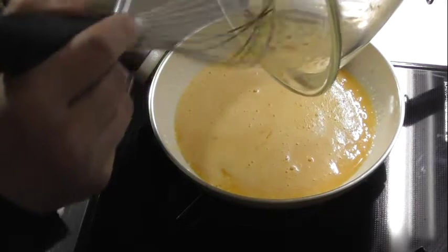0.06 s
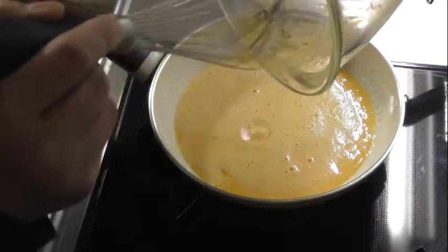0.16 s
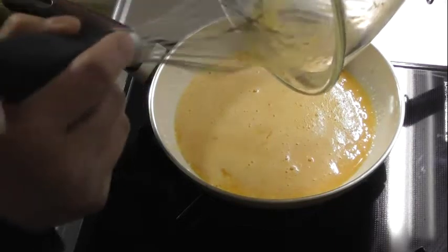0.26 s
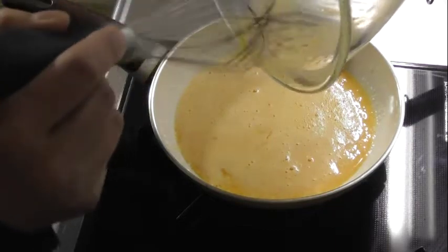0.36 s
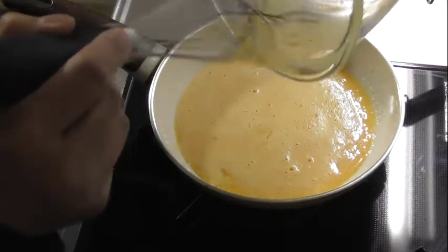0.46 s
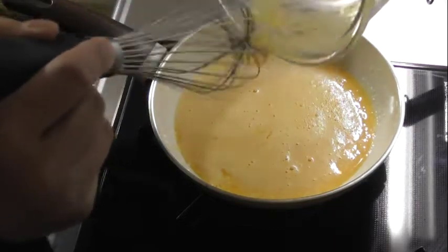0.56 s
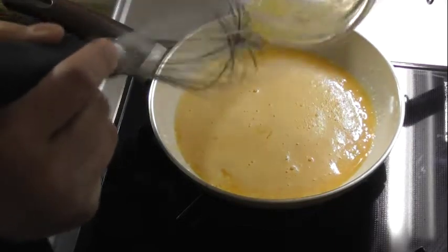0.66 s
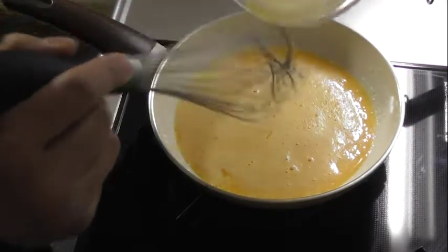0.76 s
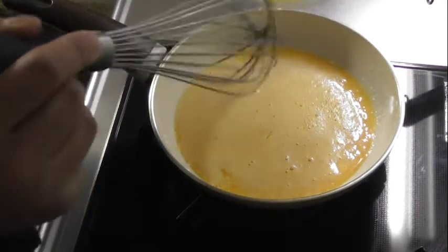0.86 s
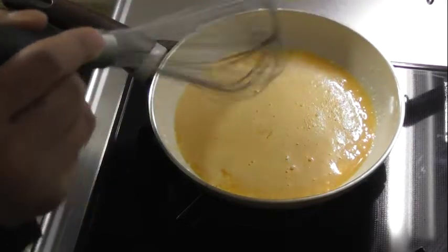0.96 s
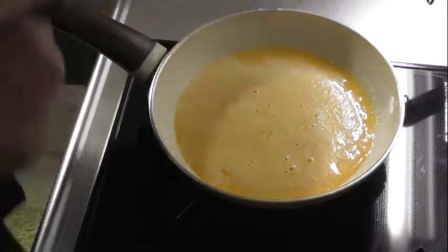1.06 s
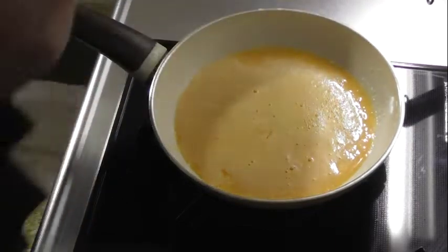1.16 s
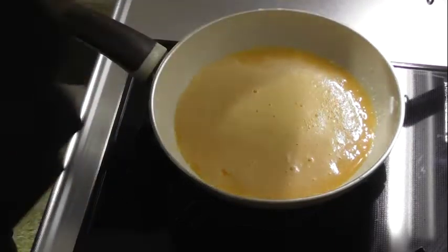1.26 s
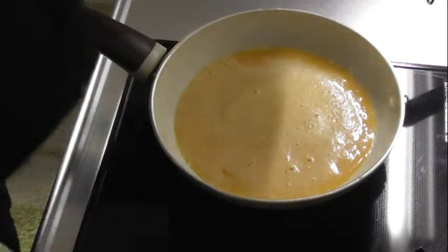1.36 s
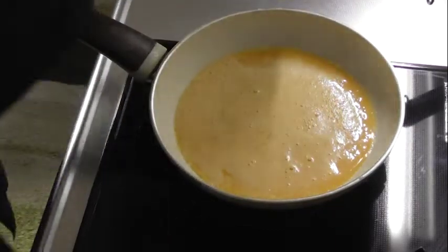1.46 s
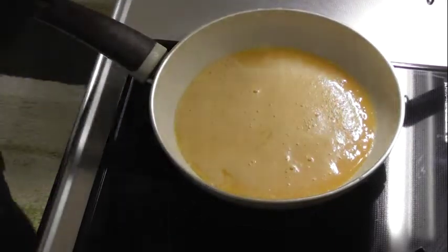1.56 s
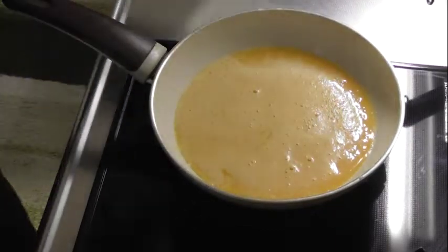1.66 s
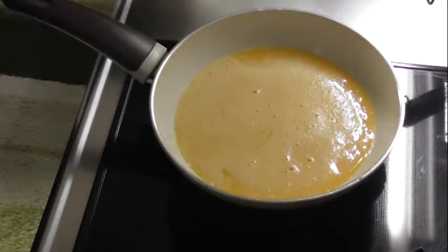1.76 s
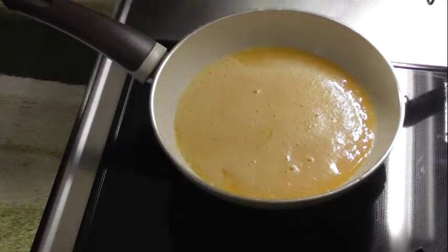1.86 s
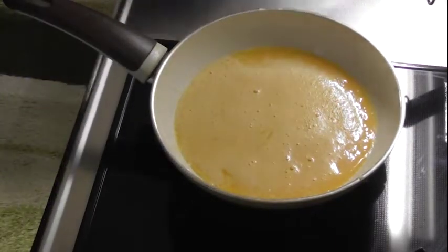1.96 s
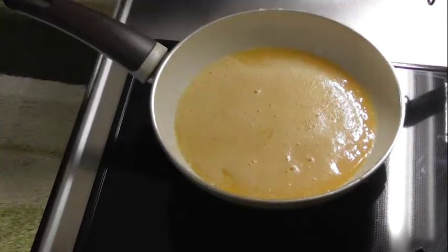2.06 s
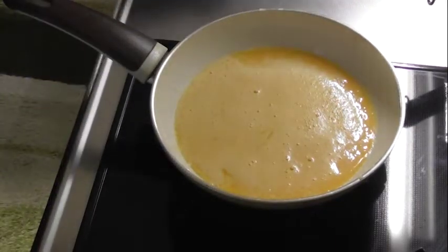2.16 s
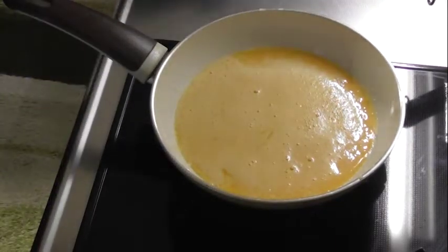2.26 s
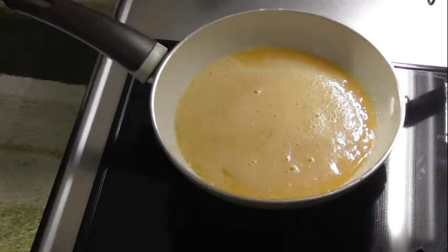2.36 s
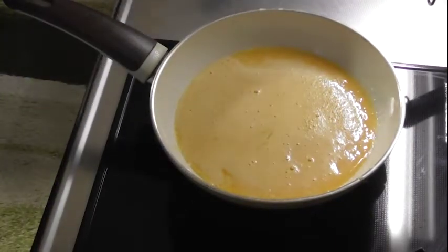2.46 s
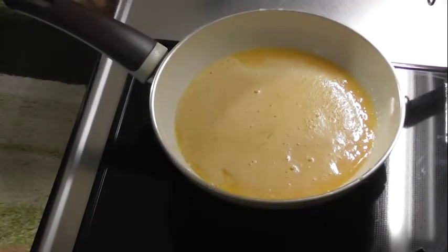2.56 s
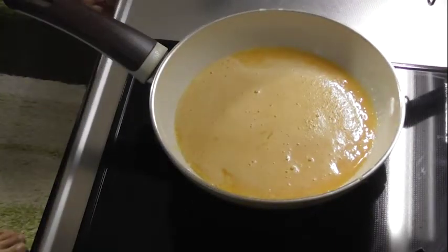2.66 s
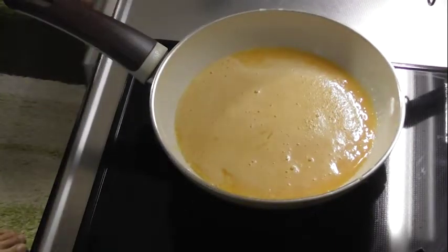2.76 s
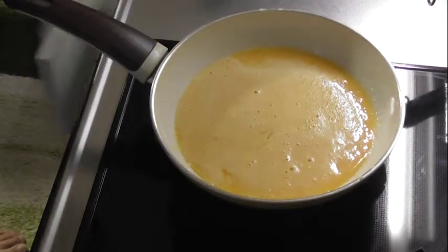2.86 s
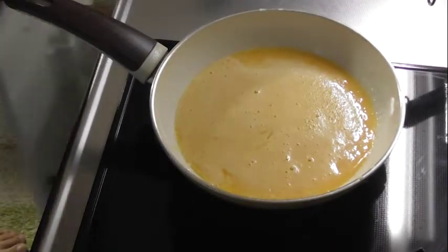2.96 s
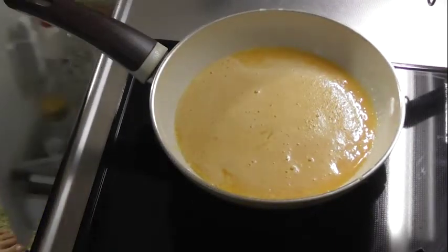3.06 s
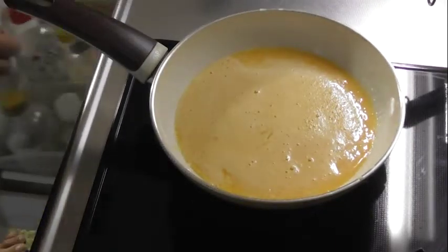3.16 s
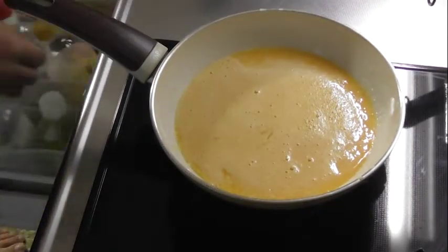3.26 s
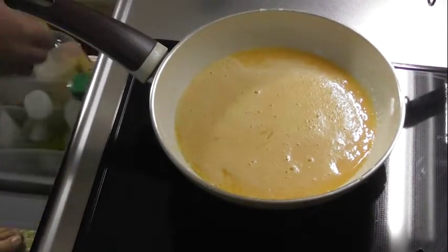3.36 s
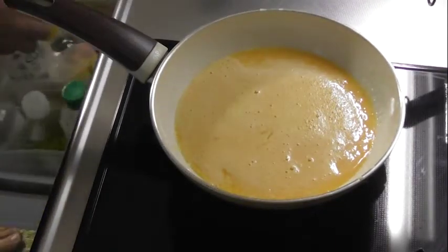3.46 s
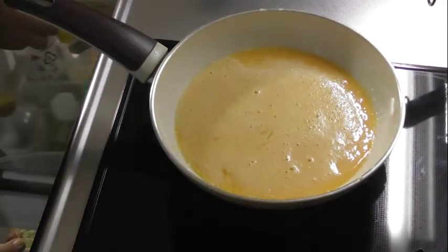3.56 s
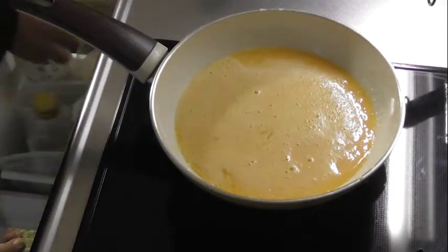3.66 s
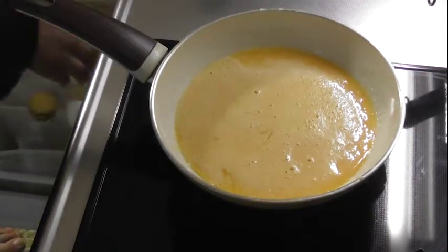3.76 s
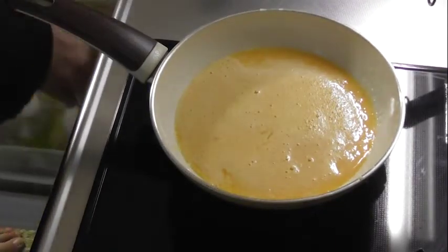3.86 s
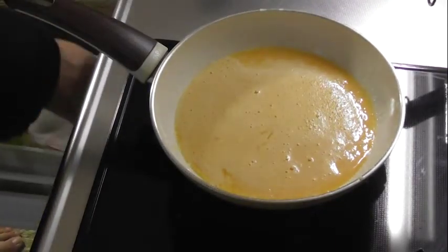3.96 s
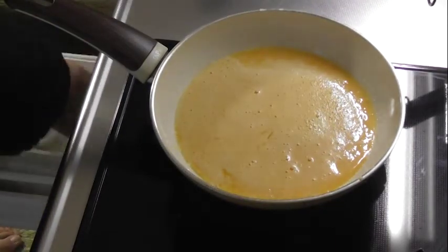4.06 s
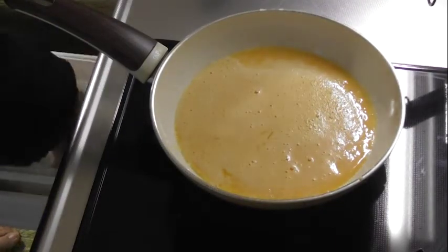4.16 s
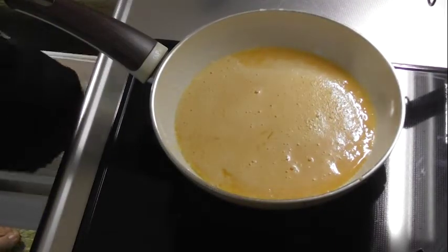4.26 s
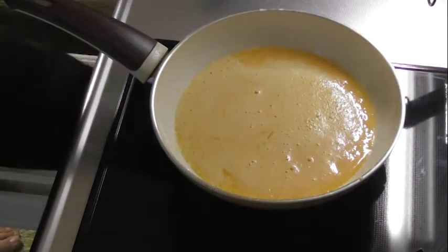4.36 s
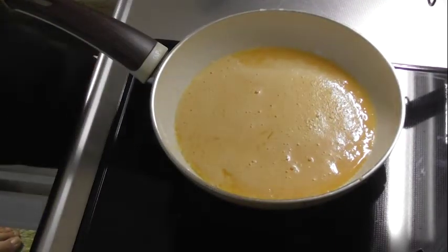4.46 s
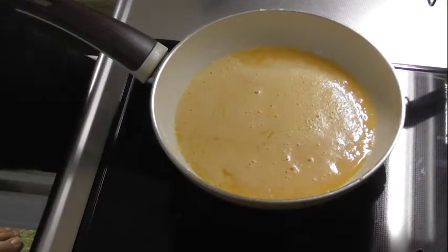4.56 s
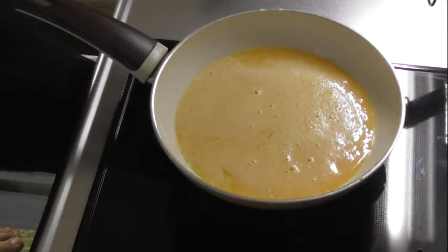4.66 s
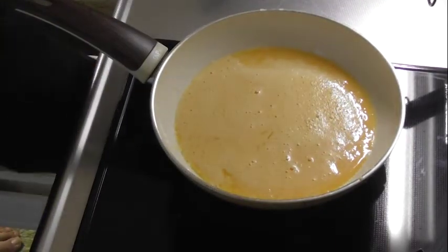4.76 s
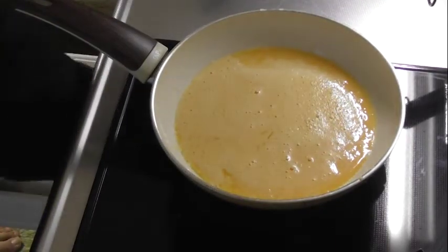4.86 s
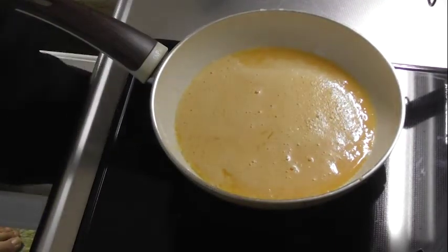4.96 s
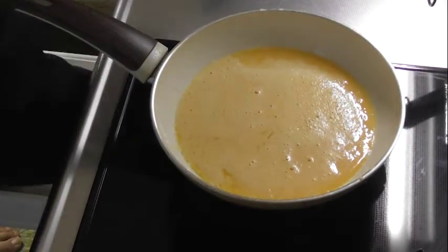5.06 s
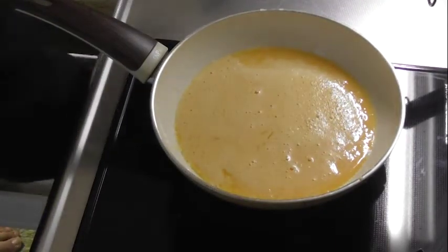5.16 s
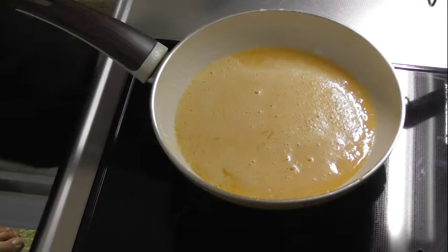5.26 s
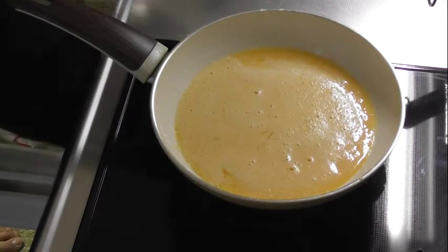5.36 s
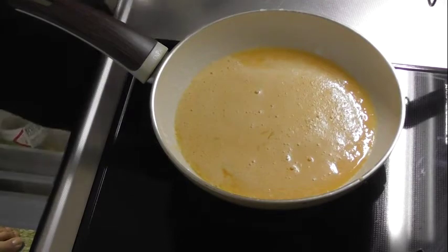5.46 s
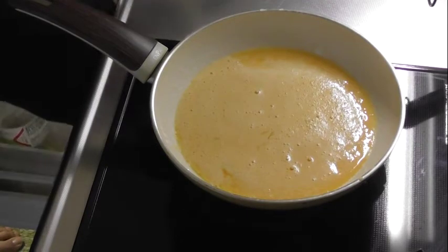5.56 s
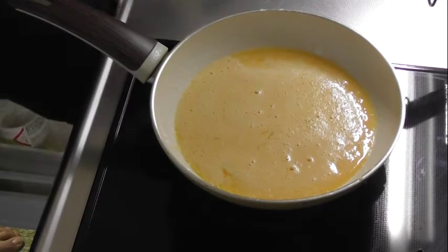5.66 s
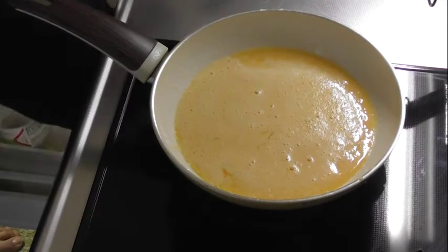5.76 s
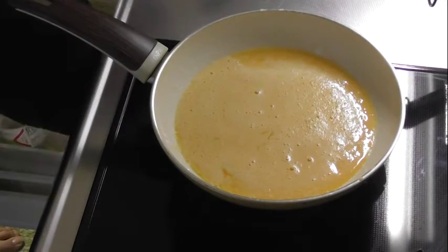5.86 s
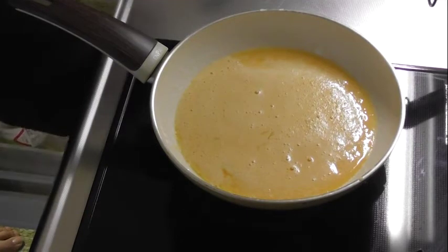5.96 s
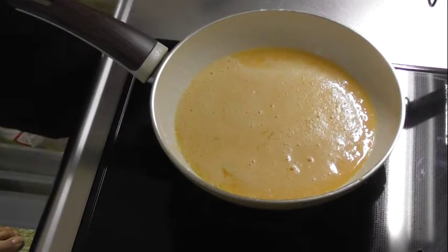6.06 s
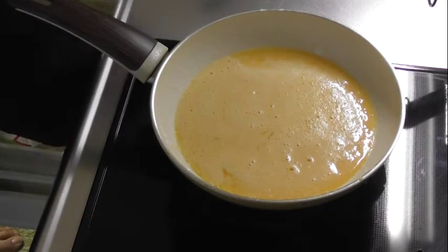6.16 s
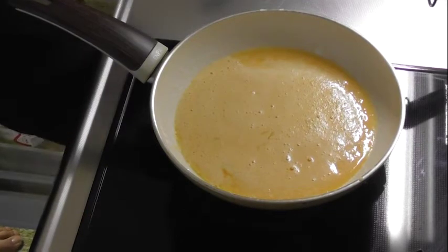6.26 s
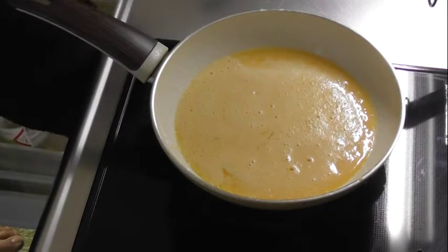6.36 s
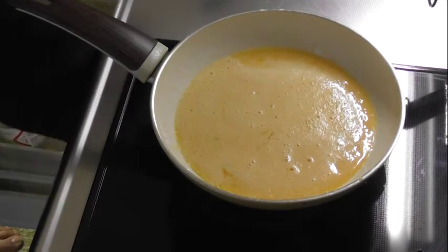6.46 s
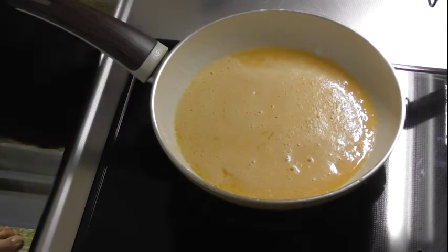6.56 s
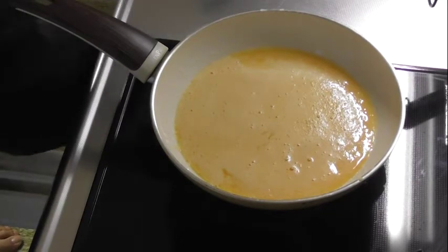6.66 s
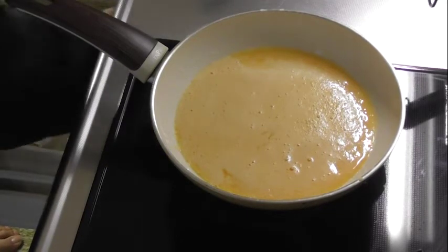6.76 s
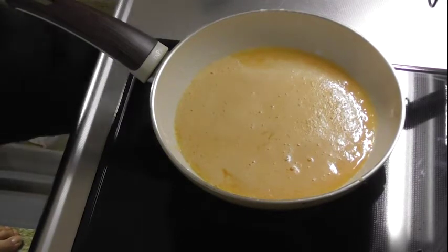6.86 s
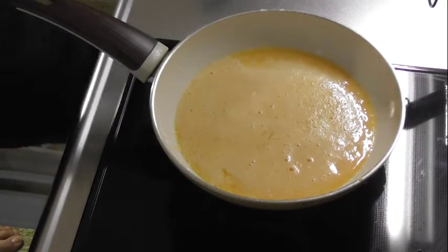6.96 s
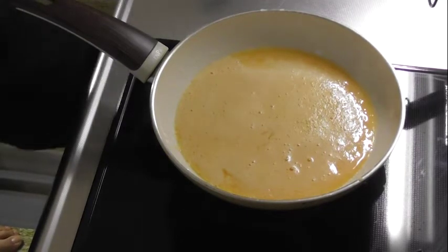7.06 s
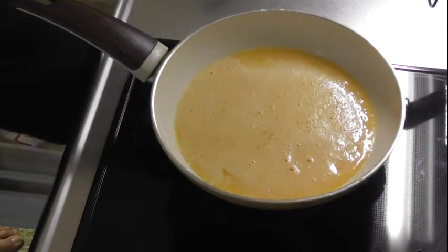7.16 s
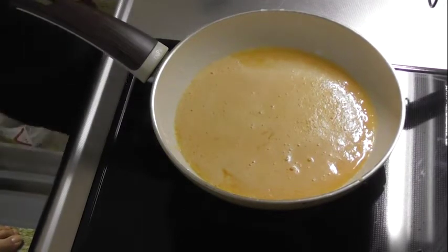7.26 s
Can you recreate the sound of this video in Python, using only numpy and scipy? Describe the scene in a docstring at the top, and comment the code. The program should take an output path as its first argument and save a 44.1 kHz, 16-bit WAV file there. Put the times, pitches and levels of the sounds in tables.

```python
"""A wire whisk clinks on the rim of a glass bowl and is dropped into it, and the bowl is put aside; a kitchen
drawer jerks open and rolls out, and a hand rummages among plastic bottles, packets and small metal things and
bumps a pot, all in a small kitchen. Glass and metal are resonators rung by bursts of tiny contacts, the pot
and drawer blows are decaying modes, plastic is crackle through damped resonances; rumble, packets and cloth
are coloured noise that follows how busy the hand is."""
import sys
import numpy as np
from scipy import signal
from scipy.fft import rfft, irfft, next_fast_len
from scipy.io import wavfile
from scipy.ndimage import uniform_filter1d

SR = 44100
rng = np.random.default_rng(int(sys.argv[2]) if len(sys.argv) > 2 else 0)


def persist_wave(psi):
    """Save psi, clipped to +-1, as 16-bit WAV."""
    counts = np.round(np.clip(psi, -1, 1) * 32767).astype(np.int16)
    wavfile.write(sys.argv[1], SR, np.atleast_2d(counts).T)


N = 322812
TIME = np.arange(N) / SR
AGE = TIME[:int(.7 * SR)]  # time since a blow; each blow is followed for 0.7 s

# All levels are relative: a gain in the layer or the mix may follow.
# resonances of the drawer's panels: mode_hz, level_db, t60_s
DRAWER_MODES = [(119.6, -6, 0.54), (177.6, 4.5, 0.57), (229.8, -5, 0.99), (271.2, -3, 0.83),
                (370.4, 0.5, 0.25), (446.4, -0.5, 1), (479, 2.5, 0.45), (557, -15, 0.31),
                (654.3, -3.5, 0.38), (771, -12, 0.2), (882, -2.5, 0.14), (950, -28, 0.13),
                (1039, -5.5, 0.23)]
# resonances of small thin metal things: mode_hz, level_db, t60_s
METAL_MODES = [(2880, -16, 0.11), (4460, -2, 0.048), (4560, -2.5, 0.04), (5985, 4, 0.037), (6140, -11, .12),
               (6300, -2, 0.22), (6667, 1.5, 0.077), (7843, -5, 0.14), (8043, 1.5, .12), (8280, -3, 0.037),
               (9386, 2.5, 0.22), (11079, -3.5, 0.24), (13460, -13, .15), (14475, -13, .2)]
# spectrum of the load thudding in the drawer: freq_hz, density_db (per Hz)
THUD_SPECTRUM = [(25, -58), (50, -15), (100, 1), (180, -4), (315, -10), (480, 2), (725, -9), (900, -6),
                 (1300, -31), (2000, -35), (4000, -32), (9000, -52)]
# spectrum of crinkling packets: freq_hz, density_db (per Hz)
CRINKLE_SPECTRUM = [(300, -28), (900, -12), (1300, -6), (2300, 0), (3600, -3.5), (5000, -3), (8000, -4),
                    (16000, -23)]
# spectrum of metal scraping on metal: freq_hz, density_db (per Hz)
SCRAPE_SPECTRUM = [(2060, -23), (3500, -65), (4460, -7.5), (5220, -14), (6120, 6), (7320, -13), (8150, -3),
                   (12300, -9), (15000, -25), (16000, -10)]


def from_db(db):
    """Amplitude gain is ten to the power of a twentieth of the decibels."""
    return 10 ** (np.asarray(db) / 20)


def rms_one(x):
    """Normalisation to unit mean power."""
    return x / np.sqrt(np.mean(x ** 2) + 1e-20)


def at_hz(points, hz, axis=1):
    """Linear interpolation of a table column on a logarithmic frequency axis."""
    points = np.array(points)
    return np.interp(np.log(np.maximum(hz, 1)), np.log(points[:, 0]), points[:, axis])


def decay(t60):
    """Exponential decay by 60 dB in t60 seconds, as linear damping gives."""
    return from_db(-60 * AGE / max(t60, .005))


def coloured(x, spectrum, tilt_db=0):
    """Linear filtering: the input takes on a spectrum, tilted in dB per octave; rms 1."""
    size = next_fast_len(len(x) + 4096)
    hz = np.fft.rfftfreq(size, 1 / SR) + 1
    octaves = np.log2(np.clip(hz, 800, 9500))  # the tilt stops outside these limits
    gain = from_db(at_hz(spectrum, hz) + tilt_db * octaves)
    return rms_one(irfft(rfft(x, size) * gain, size)[:len(x)])


def grains(per_s, spread_db, size):
    """Shot noise: tiny contacts at independent random moments, of uneven strength; rms 1."""
    excess_db = spread_db * np.minimum(rng.exponential(1, size), 4)
    strength = from_db(excess_db) * rng.choice([-1, 1], size)
    return rms_one(strength * (rng.random(size) < per_s / SR))


def flicker(rate, depth_db):
    """Random amplitude modulation: the gain wanders between random levels, `rate` of them a second."""
    knots = rng.standard_normal(2000)
    return from_db(depth_db * np.interp(TIME * rate, np.arange(len(knots)), knots))


def strokes(rows, attack_s, release_t60):
    """Force envelope of pushes that set in linearly, hold and die away exponentially."""
    total = 0
    for start_s, length_s, level_db in rows:
        attack = np.clip((TIME - start_s) / attack_s, 0, 1)
        released = np.clip((TIME - start_s - length_s) / release_t60, 0, 2)
        total = total + attack * from_db(level_db - 60 * released)
    return total


def ringing(modes, weight_db=0, vary_db=5.5):
    """Modal superposition: a body's answer to one touch, which favours other modes each time."""
    hz, db, t60 = np.transpose(modes)
    levels_db = db + weight_db + vary_db * rng.standard_normal(len(hz))
    gains = from_db(levels_db) * rng.choice([-1, 1], len(hz))
    return sum(g * np.sin(2 * np.pi * f * AGE) * decay(t) for g, f, t in zip(gains, hz, t60))


def resonate(touches, modes, tilt_db, split, favoured_hz=1.0, favour_db=6.5, vary_db=3.0):
    """Driven resonance with lifted degeneracy: an imperfect shape splits each mode into a beating pair."""
    out = 0
    for hz, db, t60 in modes:
        radius = from_db(-60 / (max(t60, .005) * SR))  # pole radius: decay per sample
        angles = 2 * np.pi * hz / SR * (1 + split * rng.uniform(0.64, 1) * np.array([-1, 1]))
        pair = 0
        for angle in angles:
            poles = [1, -2 * radius * np.cos(angle), radius * radius]
            pair = pair + signal.lfilter([1, 0, -1], poles, touches + 1e-18)
        # the contact point favours modes near one pitch
        nearness = np.exp(-(np.log(hz / favoured_hz) / 0.018) ** 2)
        octaves = np.log2(min(hz, 9500) / modes[0][0])
        level_db = db + tilt_db * octaves + favour_db * nearness + vary_db * rng.standard_normal()
        out = out + from_db(level_db) * rms_one(pair)
    return rms_one(out)


def add(track, s, peak_db, sound):
    """Superposition: lay a sound in at a time and peak level, judged by power over its loudest 7 ms."""
    start = int(np.clip(s * SR, 0, N - 1))
    peak = np.sqrt(7 * uniform_filter1d(sound ** 2, size=300).max())
    track[start:start + len(sound)] += (from_db(peak_db) * sound / peak)[:N - start]


def rattles(rows, modes, buzz, buzz_db, rise_s, settle_s, tail_db, tail_t60, split):
    """Repeated impact: springy metal bounces many times a blow, then shivers on, ringing modes and buzzing."""
    out = np.zeros(N)
    for start_s, peak_db, rattle_s, tilt_db, favoured_hz in rows:
        settling = np.exp(-np.maximum(AGE - rattle_s, 0) / settle_s)
        pressing = settling + from_db(tail_db) * decay(tail_t60)
        onset = np.minimum(0.51 + AGE / rise_s, 1)
        touches = grains(4000, 3.0, len(AGE)) * pressing * onset
        shiver = coloured(touches, buzz, tilt_db)
        ring = resonate(touches, modes, tilt_db, split, favoured_hz)
        add(out, start_s, peak_db, ring + from_db(buzz_db) * shiver)
    return out


def busyness():
    """Source strength: how busily things are shifted about, as a gain over time."""
    # level of the load's rumble: time_s, level_db
    shifting = [(0, -47.5), (.9, -48), (1.55, -38), (2.5, -38), (2.9, -27.5), (3.25, -33.5), (4.1, -30.5),
                (4.6, -37), (5.05, -33.5), (5.25, -39.5), (5.95, -26.5), (6.25, -39), (6.55, -28), (7, -33),
                (7.32, -37)]
    return from_db(np.interp(TIME, *np.transpose(shifting)))


def cloth(busy):
    """Friction noise: cloth hisses with the handling, and each pass of a sleeve swells and fades."""
    # sleeve brushing past: fastest_s, level_db, half_length_s
    sleeve = [(1.246, -48, 0.067), (2.585, -42, 0.034), (2.958, -46.5, 0.091), (3.55, -43, 0.056),
              (3.86, -45.5, 0.099), (4.2, -54, 0.15), (5.057, -43.5, 0.039), (5.526, -42, 0.088),
              (6.33, -48.5, 0.082), (7.105, -53, 0.21)]
    # hiss of cloth: freq_hz, density_db (per Hz)
    swish_spectrum = [(2000, -26), (4000, -13.5), (6500, 11.5), (9000, 5), (12000, -4), (16000, -12.5)]
    passes = sum(from_db(db) * np.exp(-.5 * ((TIME - s) / half_s) ** 2) for s, db, half_s in sleeve)
    level = np.hypot(passes, busy * from_db(-21.5))  # independent noises add in power
    return level * coloured(rng.standard_normal(N), swish_spectrum) * flicker(37, 0.68)


def packets(busy):
    """Crackling noise: fine crinkles flicker, and now and then a stiff crease gives way."""
    fine = from_db(-17.5) * grains(4000, 1.9, N) * flicker(60, 2.5)
    stiff = from_db(-23.5) * grains(90, 2.3, N)
    creases = fine + stiff
    return busy * creases.std() * coloured(creases, CRINKLE_SPECTRUM)


def load_rumble(busy):
    """Impact noise: the shifted load knocks densely and at random, heard as a flickering rumble."""
    # rumble of the load: freq_hz, density_db (per Hz)
    rumble_spectrum = [(15, -36), (30, -9), (70, 0), (105, 3.5), (170, -2.5), (225, -3), (300, -8),
                       (455, 2), (600, -5.5), (745, -15), (915, -10), (1100, -27.5), (1600, -30.5),
                       (2080, -29), (3500, -77)]
    return busy * coloured(grains(2500, 2.5, N), rumble_spectrum) * flicker(25, 2.4)


def runners():
    """Forced vibration: rollers judder over the runners, the drawer's panels drone and its load shakes."""
    # drawer being pulled out: start_s, length_s, level_db
    pulls = [(1.985, 0.393, -27), (2.14, 0.016, -22.5)]
    judder = grains(896, 3.0, N) * flicker(40, 4.2)
    drone = resonate(judder, DRAWER_MODES, -1.2, split=0.00099)
    shake = coloured(judder, THUD_SPECTRUM)
    return strokes(pulls, attack_s=.02, release_t60=.28) * (drone + shake)


def bumps(focus_db=5.5, rise_s=0.00083):
    """Selective modal excitation: a dull blow drives the drawer's modes near its own pitch and shakes the load."""
    # bumps of the drawer and its contents: start_s, peak_db, centre_hz, load_t60_s
    blows = [(1.972, 1.5, 510, 0.054), (2.038, -10.5, 450, .25), (2.159, -5, 364, 0.13),
             (2.169, -6.5, 182, 0.31), (2.224, -9, 476, 0.12), (2.293, -4.5, 225, 0.057),
             (2.362, -4, 303, 0.2), (2.609, -19, 159, 0.28), (2.706, -18.5, 200, 0.17),
             (2.807, -10, 433, 0.28), (2.923, -9.5, 190, 0.22), (2.949, -12.5, 560, .15),
             (3.02, -11.5, 224, 0.21), (3.147, -15.5, 151, 0.42), (3.416, -9, 198, 0.44),
             (3.496, -14.5, 556, 0.26), (3.771, -11.5, 238, 0.48), (3.839, -15.5, 264, .25),
             (4.112, -8.5, 374, 0.12), (4.149, -10.5, 380, 0.11), (4.347, -10, 394, 0.068),
             (4.865, -21, 380, .3), (5.382, -13.5, 122, 0.28), (5.696, -11.5, 330, 0.18),
             (5.961, -12.5, 484, 0.13), (6.427, -16, 490, 0.2), (6.789, -21, 376, 0.1),
             (6.852, -8, 700, 0.22), (7.303, -14.5, 483, .15)]
    out = np.zeros(N)
    for start_s, peak_db, centre_hz, t60 in blows:
        distance = np.log2(np.array(DRAWER_MODES)[:, 0] / centre_hz)  # octaves
        wood = ringing(DRAWER_MODES, -focus_db * distance ** 2) * decay(3 * t60)
        colour = [(hz, level - focus_db * min(np.log2(hz / centre_hz), 1.6) ** 2)
                  for hz, level in THUD_SPECTRUM]
        shaking = decay(t60) + 0.15 * decay(0.056)
        load = coloured(rng.standard_normal(len(AGE)), colour) * shaking
        onset = 1 - np.exp(-AGE / rise_s)
        add(out, start_s, peak_db, (rms_one(wood) + rms_one(load)) * onset)
    return out


def snaps(ring_db=-10.5, crack=0.45):
    """Damped resonance: plastic ticks with a crack and a short crackle, which its shell colours."""
    # ticking and snapping plastic: start_s, peak_db, tilt_db (per octave), t60_s
    ticks = [(1.9727, -8.5, 5, .05), (2.1515, -19.5, -1.5, 0.21), (2.3608, -8.5, -16, 0.066),
             (2.7087, -16.5, 1, 0.14), (2.7448, -20.5, -1.5, 0.36), (2.8084, -27, -6, 0.14),
             (3.0175, -18.5, -2.5, 0.17), (3.1653, -14, 10, 0.093), (3.2986, -25.5, 2, .06),
             (3.3724, -21, -1, .16), (3.4173, -19, 2, 0.13), (3.496, -22, -1.5, 0.75),
             (3.5506, -17.5, 13, 0.23), (3.5774, -17, 28, 0.081), (3.6955, -18, -5.5, 0.26),
             (3.7708, -15, 0, 0.098), (3.7976, -10, -1.5, 0.22), (3.8746, -19, -0.5, 0.23),
             (3.9978, -23.5, 8.5, .15), (4.127, -23.5, 3, 0.46), (4.343, -23, 2, 0.24),
             (4.6671, -15, 2.5, .18), (4.8633, -21.5, -2.5, 0.34), (5.0851, -24, -5, 0.19),
             (5.4875, -20.5, -4, 0.51), (5.687, -14, -2, 0.32), (5.7095, -16, -2.5, .25),
             (5.9486, -15, -1, 0.36), (6.4278, -18, 0, .19), (6.4878, -19.5, -7, .14),
             (6.7897, -13.5, 5, 0.25), (6.8534, -15, 0.5, 0.38), (7.3015, -13, 0.5, .07)]
    # resonances of plastic bottles: mode_hz, level_db, t60_s
    shell_modes = [(1640, 2.5, 0.019), (2358, -3.5, 0.033), (3100, -6, 0.041), (5990, -4, 0.019)]
    # body of the tick: freq_hz, density_db (per Hz)
    plastic_spectrum = [(100, -21), (590, 8), (1000, -5), (1450, -11), (1590, -5), (1870, -3.5),
                        (2390, -5.5), (2590, -3.5), (3340, -6.5), (6470, -2.5), (16000, -24)]
    out = np.zeros(N)
    for start_s, peak_db, tilt_db, t60 in ticks:
        creases = grains(3000, 4.1, len(AGE)) * (decay(t60) + crack * decay(0.0077))
        shell = resonate(creases, shell_modes, tilt_db, split=0.017)
        add(out, start_s, peak_db, coloured(creases, plastic_spectrum, tilt_db) + from_db(ring_db) * shell)
    return out


def slides(ring_db=-4.5, scrape_db=-5.0, crinkle_db=-11.0):
    """Friction excitation: dragged metal catches unevenly, rings, scrapes and disturbs the packets around it."""
    # metal sliding over metal, one row a stroke: start_s, length_s, level_db
    drags = [(5.69, 0.073, -31.5), (5.75, 0.092, -25), (5.865, 0.054, -24.5), (5.95, .16, -22.5),
             (6.5, 0.088, -33), (6.578, .105, -24.5)]
    catches = grains(900, 3.6, N) * flicker(70, 3) * strokes(drags, attack_s=.0045, release_t60=.2)
    ring = from_db(ring_db) * resonate(catches, METAL_MODES, 0, split=0.00048)
    scrape = from_db(scrape_db) * coloured(catches, SCRAPE_SPECTRUM)
    crinkle = from_db(crinkle_db) * coloured(catches, CRINKLE_SPECTRUM)
    return catches.std() * (ring + (scrape + crinkle))  # the three parts have rms 1 before their gains


def metal_chinks():
    """Repeated impact: small metal things knock together, ringing their modes over a scraping buzz."""
    # knocks: start_s, peak_db, rattle_s, tilt_db (per octave), favoured_hz
    chinks = [(4.6683, -9, 0.0092, -4, 4575), (4.859, -15, 0.015, -3, 5985),
              (4.9952, -24.5, 0.0074, -2, 6270), (5.5069, -24, 0.0099, 12, 8260),
              (5.5318, -20, 0.017, 14, 8043), (5.7489, -8.5, 0.0046, 9, 9395),
              (5.8062, -7.5, .004, 10, 8300), (5.8661, -16, 0.01, -4, 5985), (5.9484, -16, .012, -7, 6360),
              (5.9844, -12.5, 0.0082, -5, 6310), (6.0333, -19, .011, -14, 5985),
              (6.5141, -26, 0.0057, -8, 6270), (6.5775, -10.5, 0.0065, 0, 9395),
              (6.6293, -10, .009, 16, 9395), (6.6757, -12, .005, -4, 5985),
              (6.8217, -8.5, .005, -6.5, 5985)]
    return rattles(chinks, METAL_MODES, SCRAPE_SPECTRUM, buzz_db=2.5, rise_s=0.0017, settle_s=0.0019,
                   tail_db=-4.5, tail_t60=0.16, split=0.00069)


def pot():
    """Free vibration: one blow leaves a pot humming in its decaying modes."""
    # the bump: start_s, peak_db
    pot_blow = (6.852, -3)
    # resonances of the pot: mode_hz, level_db, t60_s
    pot_modes = [(422, -2, 0.39), (540, 3, 0.285), (562, 6.5, 0.22), (630.6, 12.5, 0.19), (676, 7, 0.11),
                 (853, -1, 0.25), (914, -16.5, 1.2), (1590, -29, .4), (2150, -36, 0.36), (2414, -32, 0.22),
                 (3100, -27.5, 1.4)]
    out = np.zeros(N)
    add(out, *pot_blow, ringing(pot_modes, vary_db=2) * (1 - np.exp(-AGE / 0.00085)))
    return out


def whisk_on_bowl():
    """Repeated impact: springy wires rattle on the glass, ring its modes and shiver on after each blow."""
    # whisk on bowl: start_s, peak_db, rattle_s, tilt_db (per octave), favoured_hz
    clinks = [(.060, -6.5, 0.021, 1, 8030), (.278, -8.5, 0.026, -0.5, 8700), (.385, -31, 0.009, 4, 10780),
              (.485, -7, 0.024, 0.5, 8300), (.58, -26, 0.066, .5, 6660), (.706, -25, 0.026, 8.5, 9800),
              (.821, -9.5, 0.025, 1, 4100), (1.376, -14, 0.0087, 4.5, 9200), (1.402, -8, 0.0043, 1, 6660),
              (1.420, -12, .015, 10, 8240), (1.503, -13, 0.003, -8, 864), (1.548, -22.5, 0.01, -9, 856),
              (1.607, -27, 0.048, -7.5, 870), (1.752, -30, 0.089, -1.5, 4450),
              (2.263, -18, 0.025, -10, 4305), (2.295, -15.5, 0.018, -8.5, 2335),
              (2.388, -25, 0.0058, -7, 8200)]
    # resonances of the glass bowl: mode_hz, level_db, t60_s
    bowl_modes = [(853, -14, 0.33), (2335, -13, 0.18), (4225, 3.5, .06), (4305, -2, .12), (6685, 6.5, 0.11),
                  (8150, -7.5, .08), (8267, 4.5, 0.077), (8500, -9, 0.077), (9160, -19, 0.082),
                  (9340, -2.5, 0.038), (9700, -3.5, 0.041), (10810, -11, 0.061), (12500, -6, 0.058),
                  (13160, -10, 0.027)]
    # buzz of the wires: freq_hz, density_db (per Hz)
    wire_spectrum = [(400, -40), (900, -1.5), (1480, -36), (2400, -6), (3600, -36), (4500, -4), (5300, -11),
                     (8500, 0.5), (13000, -9), (16000, -12)]
    return rattles(clinks, bowl_modes, wire_spectrum, buzz_db=-4.0, rise_s=0.0046, settle_s=0.0062,
                   tail_db=-1.5, tail_t60=.27, split=0.0026)


def kitchen(x, wet_db, t60, early_db=-14.0, early_t60=0.049):
    """Room response by convolution: direct sound, worktop reflections and a diffuse tail unlike on each side."""
    early = rng.standard_normal((2, len(AGE))) * decay(early_t60)
    late = rng.standard_normal((2, len(AGE))) * decay(t60) * (1 - np.exp(-AGE / 0.0072))
    room = from_db(early_db) * rms_one(early) + from_db(wet_db) * rms_one(late)
    room = room / np.sqrt(len(AGE))  # from rms one to energy one
    return x + signal.fftconvolve(x[None], room, axes=1)[:, :N]


def scene():
    """Superposition of sources in two room responses: whisk and bowl close, the drawer lower and further off."""
    busy = busyness()
    handling = load_rumble(busy) + packets(busy) + cloth(busy)
    drawer = handling + runners() + pot()
    drawer = drawer + from_db(1.0) * bumps() + from_db(-3.0) * snaps()
    drawer = drawer + from_db(-2.5) * slides() + from_db(-0.5) * metal_chinks()
    whisk = from_db(-1.5) * whisk_on_bowl()
    return kitchen(drawer, wet_db=-8.0, t60=0.18) + kitchen(whisk, wet_db=-8.5, t60=0.15)


def record(dry):
    """Comb interference from a near reflection, then a microphone pair whose ports differ in level and phase."""
    # reflection near the microphone: freq_hz, lag_ms, strength (linear)
    reflection = [(300, 3.6, .1), (800, 3.36, .35), (1500, 3.03, .55), (2500, 2.916, .75),
                  (3500, 2.869, .66), (5500, 2.861, .45), (7000, 2.878, .64), (8500, 2.882, .66),
                  (11000, 2.896, .7), (15000, 2.893, .58)]
    # left over right: freq_hz, balance_db
    port_balance = [(60, 4.5), (110, -4.5), (200, -7.5), (380, 1.5), (700, -2), (1290, 0.5), (2380, -1),
                    (4400, -3.5), (8120, 1), (15000, 0)]
    # left ahead of right: freq_hz, lead_rad
    port_phase = [(100, 0.057), (400, 0.27), (1200, 1), (3000, 1), (8000, 0.97), (12000, 1), (16000, 0.71)]
    # gain of the side signal, almost mono in the low treble: freq_hz, side_db
    width = [(100, 2), (1200, -4), (2800, -27.5), (7200, -71), (8200, -5), (16000, 5.5)]
    low_cut_hz, high_cut_hz = 38, 15800
    size = next_fast_len(N + len(AGE))
    hz = np.fft.rfftfreq(size, 1 / SR)
    lag_s = at_hz(reflection, hz) / 1000
    comb = 1 + at_hz(reflection, hz, axis=2) * np.exp(-2j * np.pi * hz * lag_s)
    comb = comb / (1 + (low_cut_hz / (hz + 1)) ** 2)
    half = np.array([[.5], [-.5]])  # each port takes half of a difference
    ports = from_db(half * at_hz(port_balance, hz)) * np.exp(1j * half * at_hz(port_phase, hz))
    left, right = rfft(dry, size) * comb * ports
    mid = (left + right) / 2
    side = half * (left - right) * from_db(at_hz(width, hz))
    sound = irfft(mid + side, size)[:, :N]
    low_pass = signal.ellip(12, .1, 80, high_cut_hz, fs=SR, output="sos")
    return signal.sosfilt(low_pass, np.clip(sound, -1, 1))


dry = scene()
out = record(dry)
persist_wave(out)
```